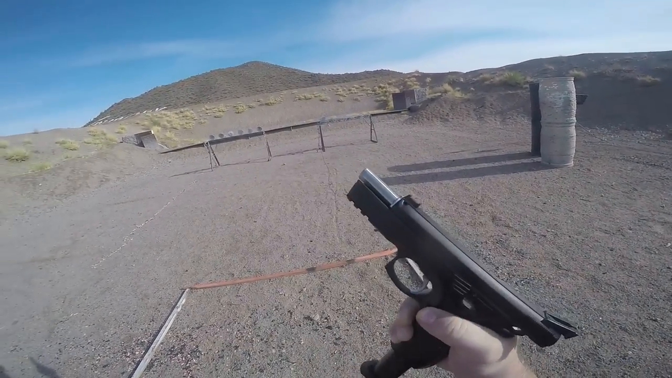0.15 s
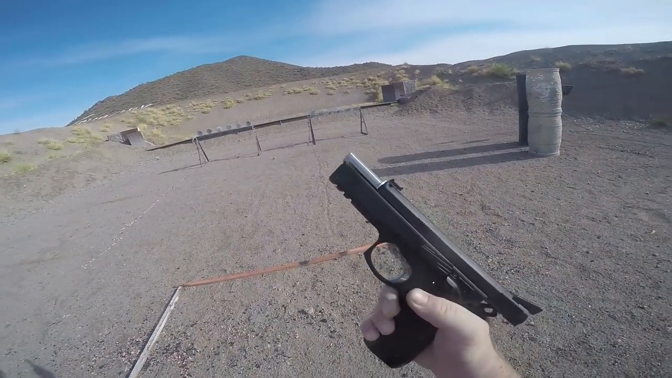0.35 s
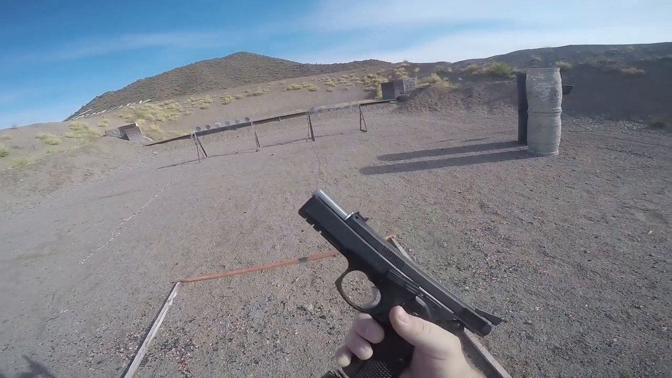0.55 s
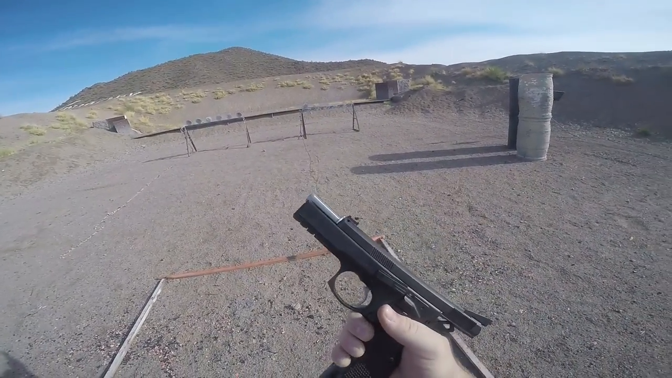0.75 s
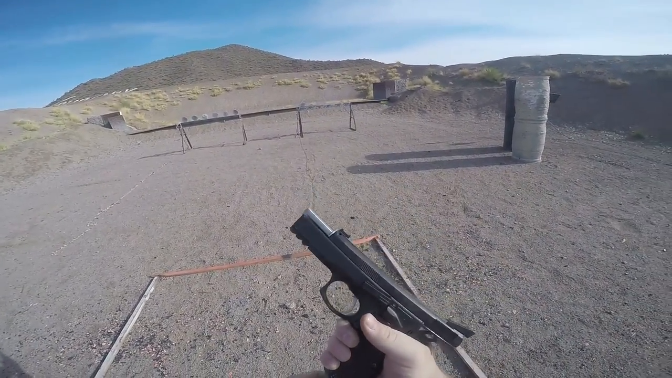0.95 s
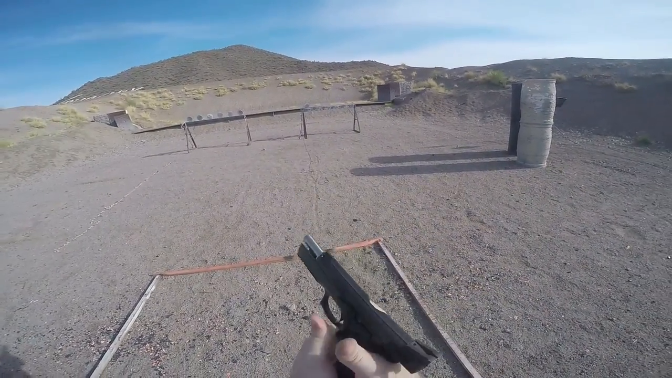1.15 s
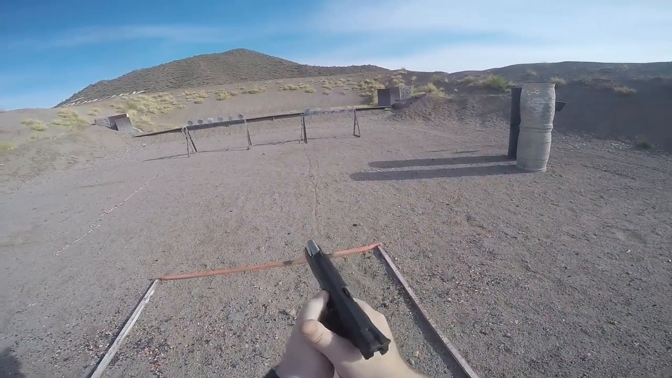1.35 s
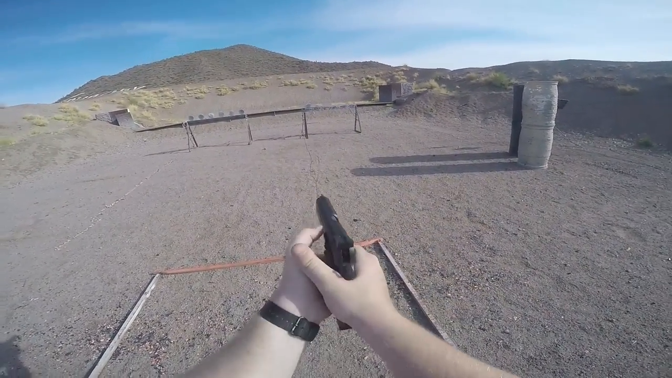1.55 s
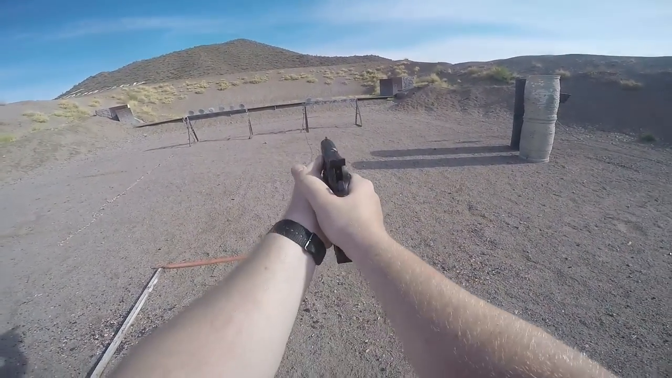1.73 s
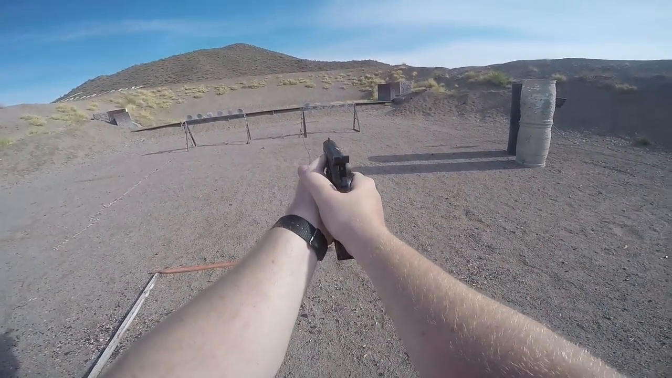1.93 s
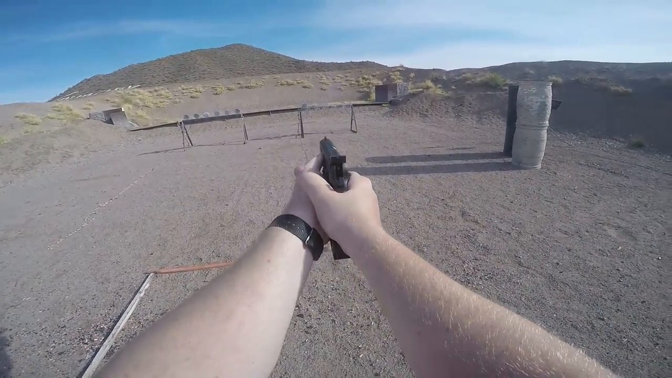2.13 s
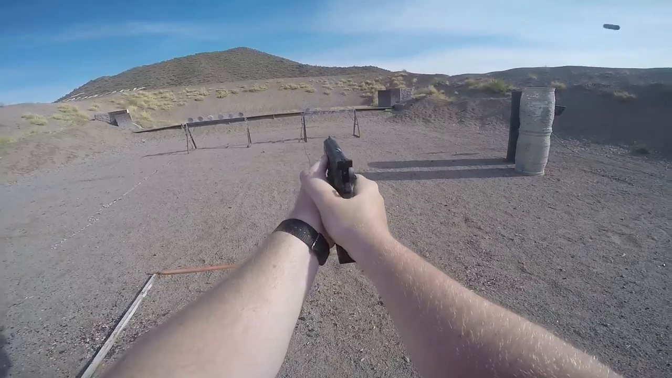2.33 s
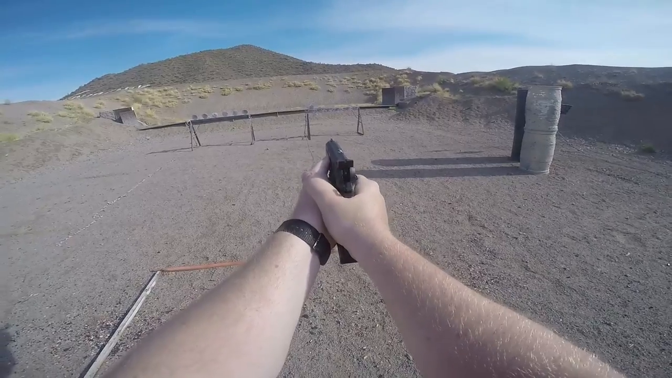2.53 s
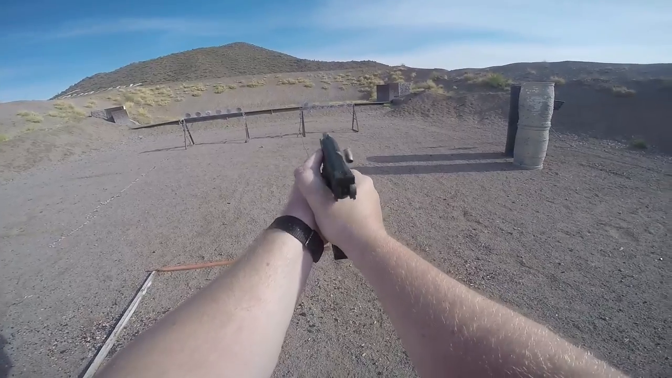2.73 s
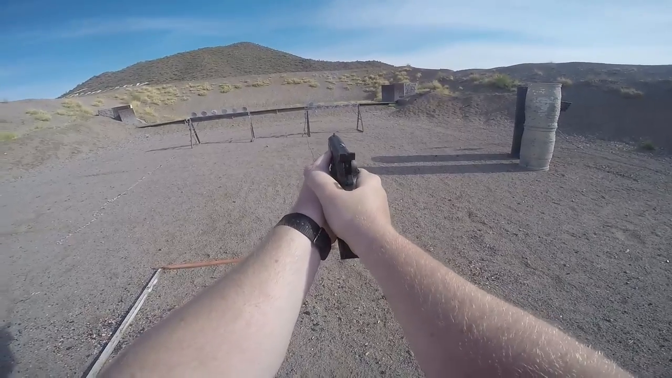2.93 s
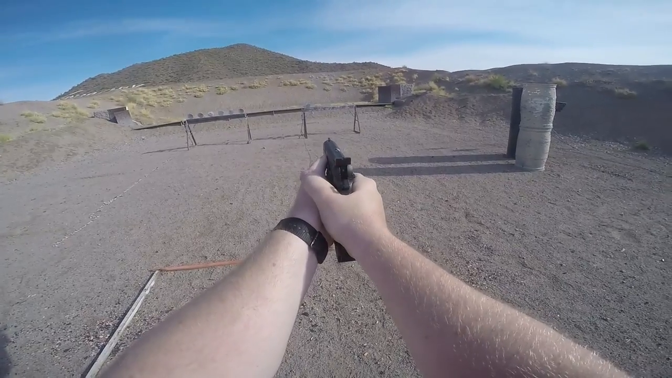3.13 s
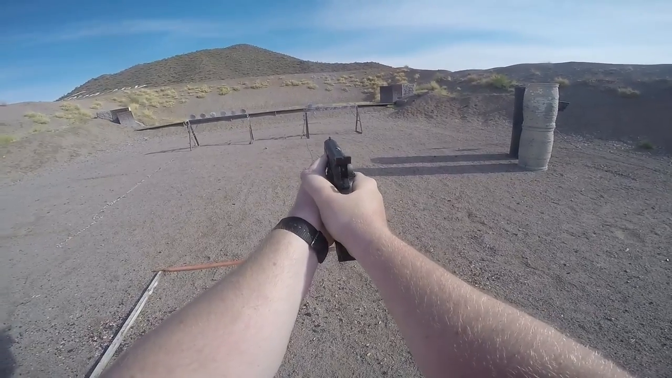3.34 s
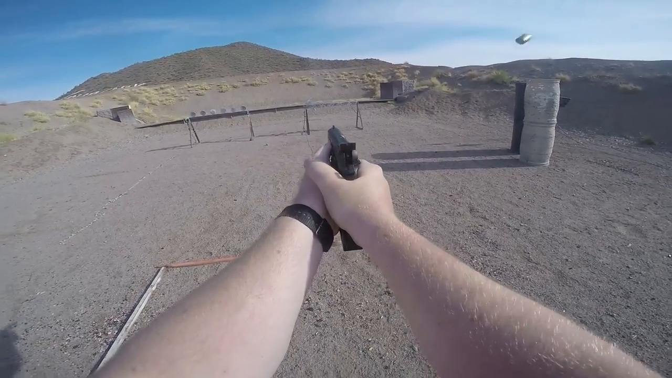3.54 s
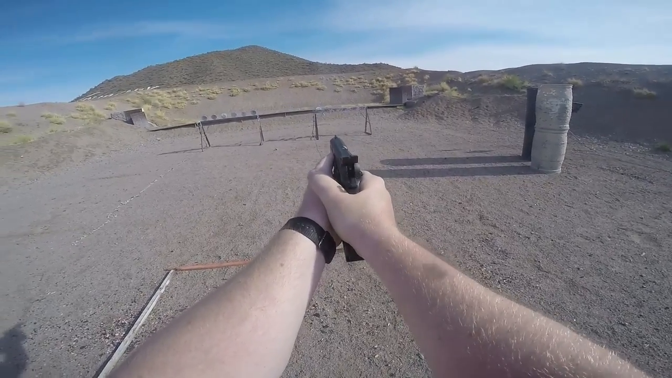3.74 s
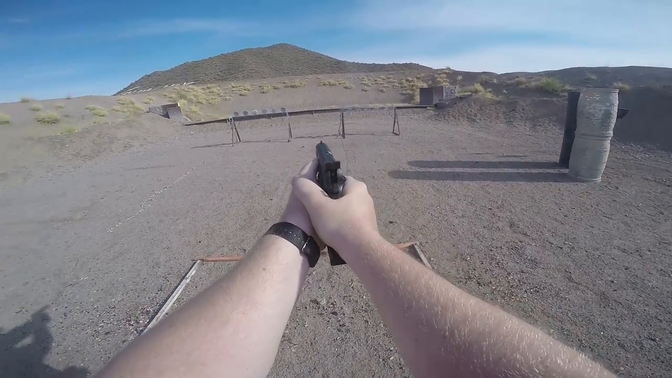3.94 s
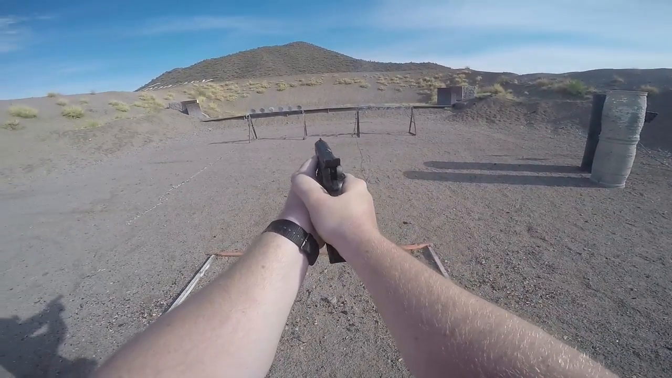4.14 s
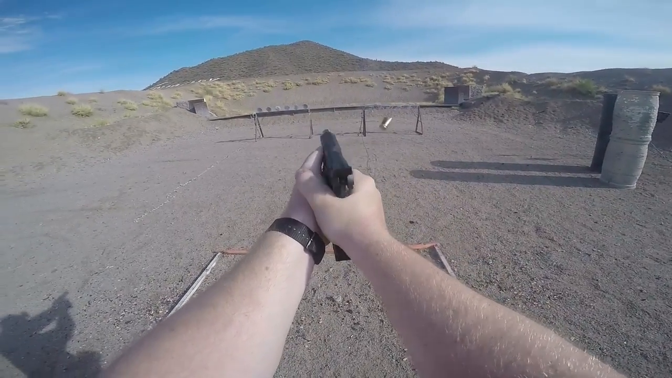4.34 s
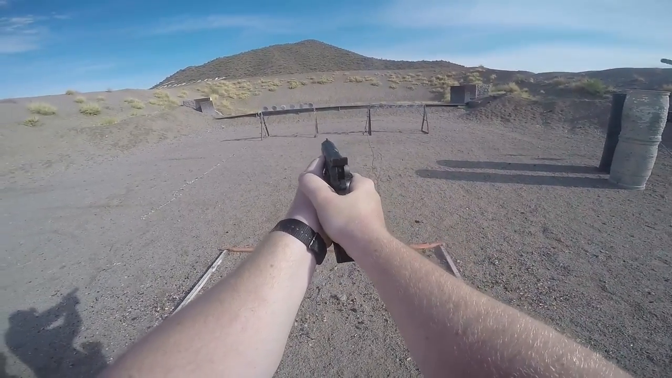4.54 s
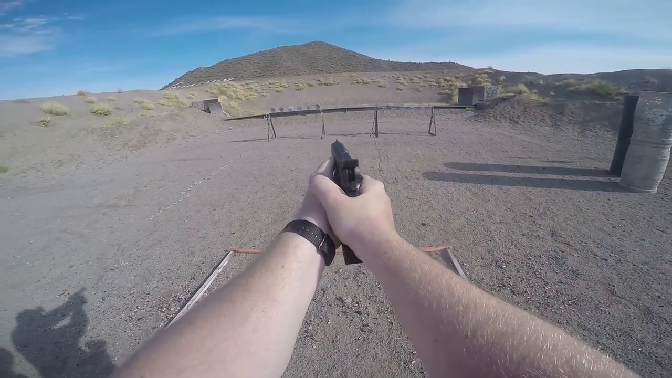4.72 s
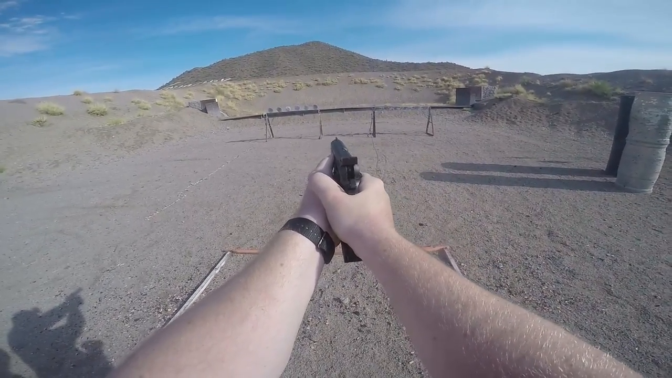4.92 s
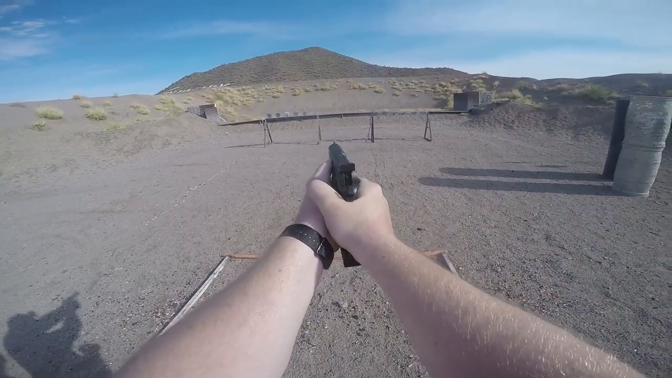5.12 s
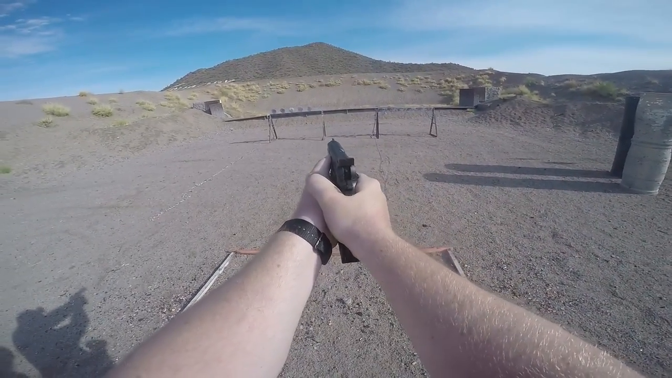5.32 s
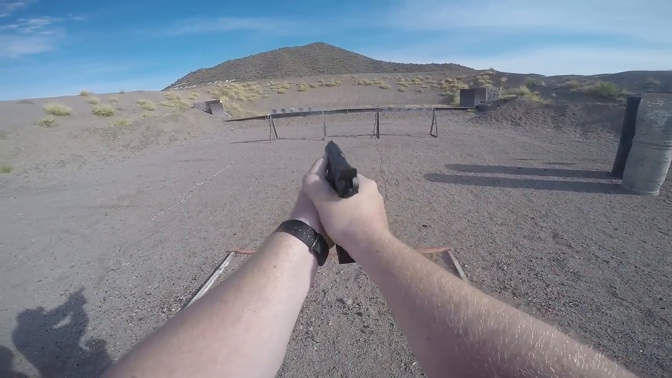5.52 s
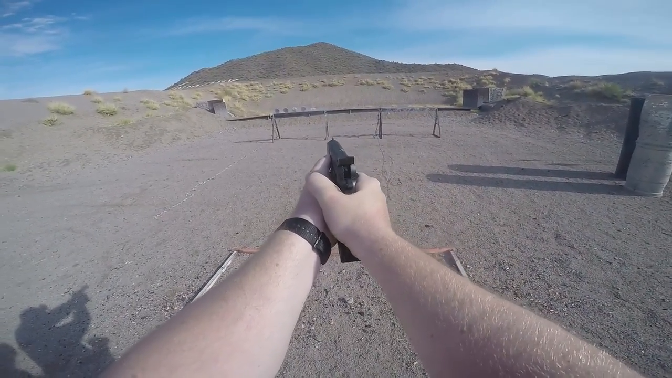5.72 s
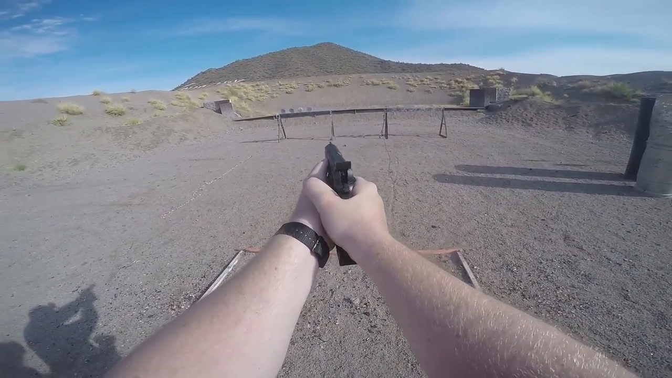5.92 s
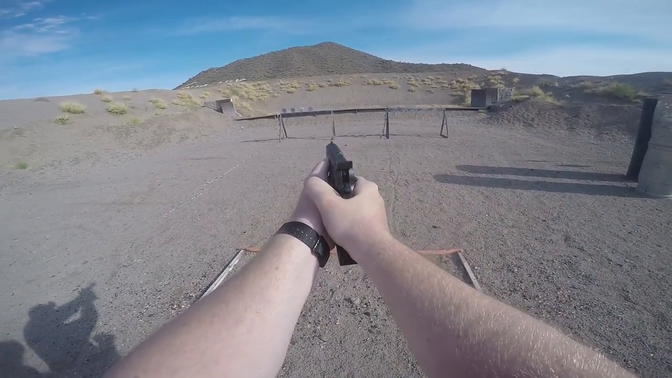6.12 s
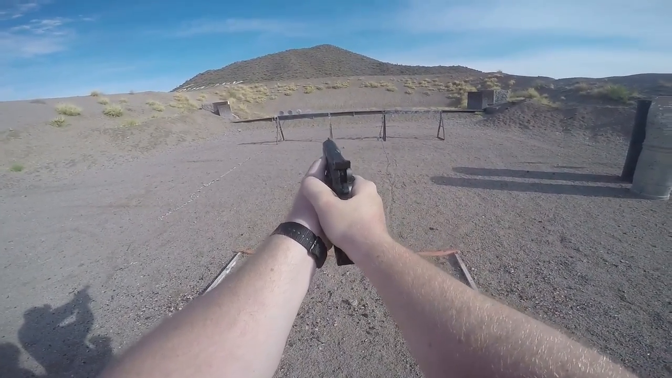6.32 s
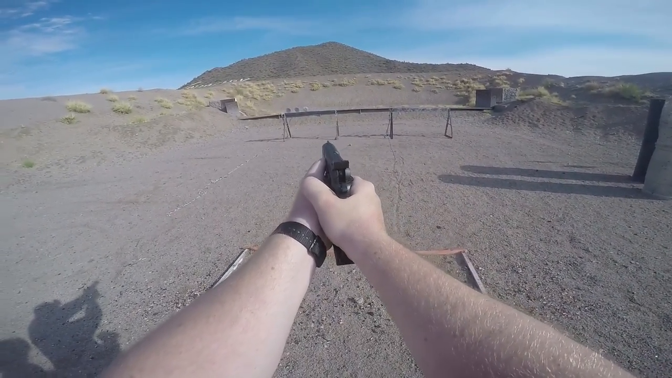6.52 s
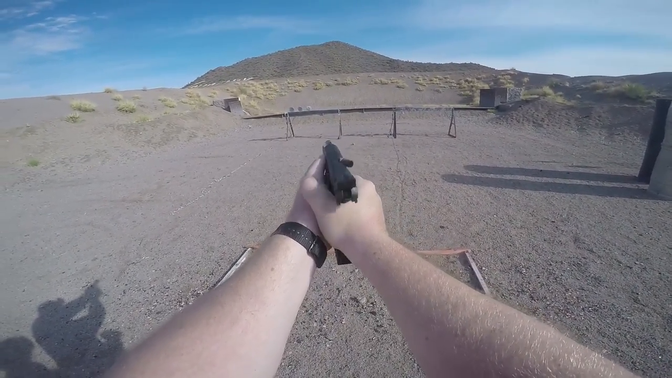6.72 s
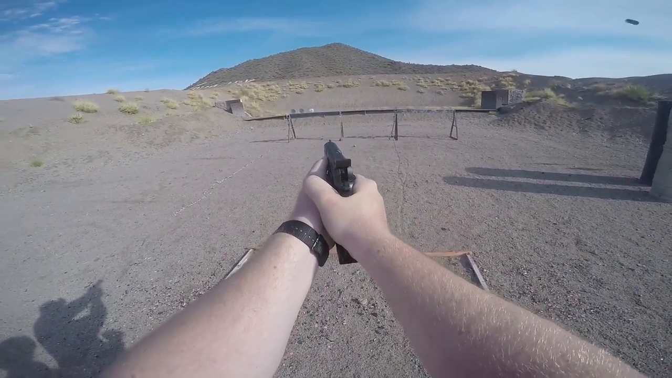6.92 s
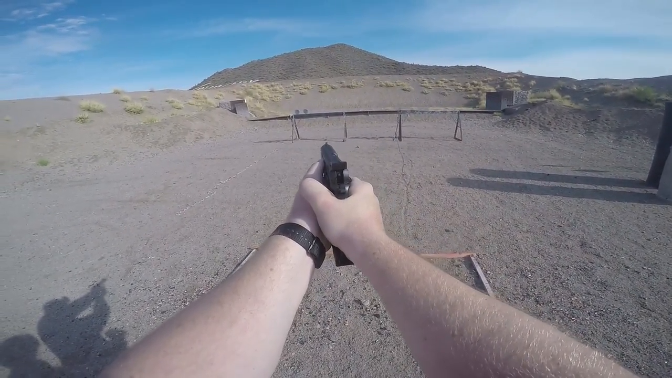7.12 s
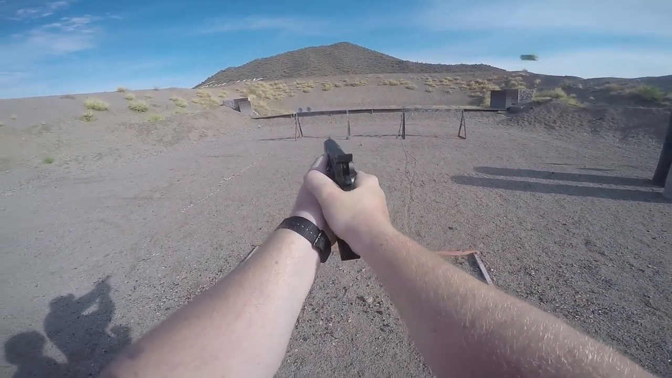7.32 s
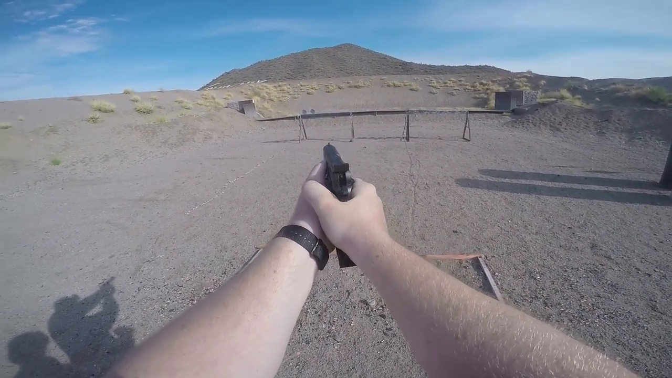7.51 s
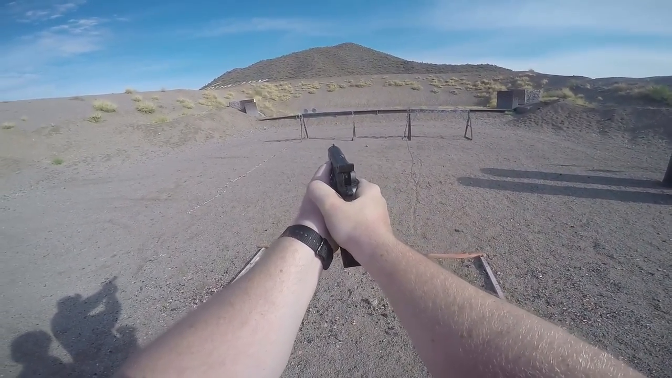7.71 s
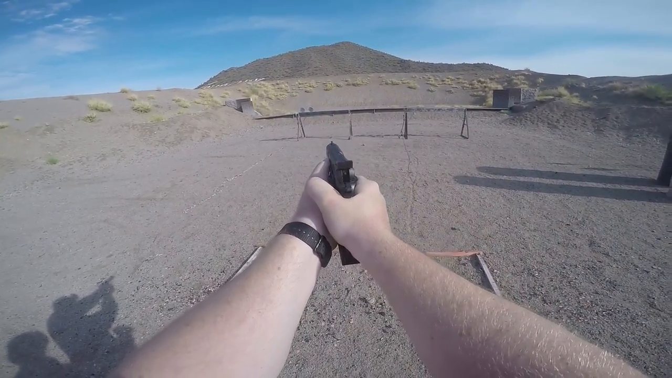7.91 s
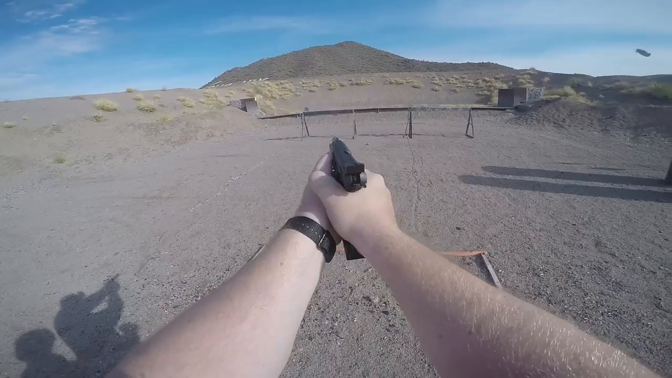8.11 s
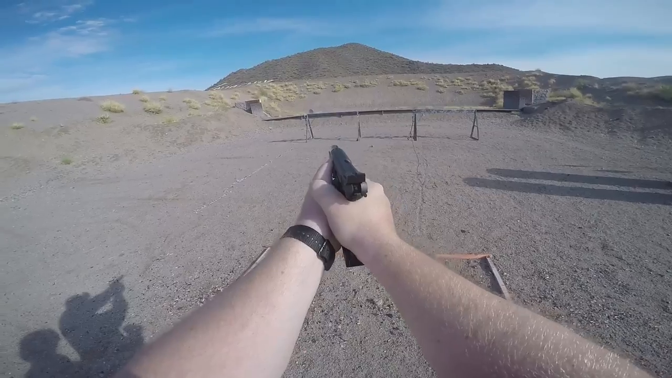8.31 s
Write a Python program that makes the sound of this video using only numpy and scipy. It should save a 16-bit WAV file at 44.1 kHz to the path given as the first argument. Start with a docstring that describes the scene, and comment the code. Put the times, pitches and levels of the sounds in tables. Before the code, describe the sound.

A pistol is handled close to the microphone on an outdoor range. Faint taps and scrapes lead to the magazine latching sharply at about 1.1 seconds, and the slide snaps shut at 1.5. Light wind rumble and far-off noise swell, with a dull distant shot at 1.9, then drop back when the firing starts.

Ten loud shots come at roughly 2.2, 2.8, 3.5, 4.4, 5.0, 5.6, 6.2, 6.8, 7.3 and 8.0 seconds. Each is a sharp crack with a heavy thump that overloads the microphone, followed by a quick slap and a short, low echo from the earth banks. A much quieter bullet impact follows each one. A fragment whines very faintly at about 3.2. From 3.6 onward, struck steel plates ring softly, and between 3.9 and 7.2 they fall onto their rack with faint clangs and pings.

```python
"""A pistol is loaded and fired ten times at steel plates in a gravel bay, heard from the shooter's head.
The magazine and slide click and scrape. Each blast bounces off the ground, echoes from the earth banks
and overloads the microphone. Bullets splash downrange and one fragment whines away; struck plates
ring, tip over and clang on their rack. Light wind, far-off noise and a thin whine swell until the
first shot, then drop back. Two dull shots come from other bays."""
import sys
import numpy as np
from scipy import signal
from scipy.fft import rfft, irfft
from scipy.io import wavfile

SR = 44100
rng = np.random.default_rng(int(sys.argv[2]) if len(sys.argv) > 2 else 0)


def log_audio(samples):
    """Write samples as a 16-bit WAV file to the path given in sys.argv[1]."""
    # one column per channel
    frames = np.atleast_2d(samples).T
    # limit to full scale, then quantise
    limited = np.clip(frames, -1, 1)
    pcm = np.round(limited * 32767).astype(np.int16)
    wavfile.write(sys.argv[1], SR, pcm)


N = 368676
EVENT_SIZE = 40960  # samples set aside for one short sound
T = np.arange(N) / SR  # seconds since the scene began
AGE = T[:EVENT_SIZE]  # seconds since a short sound began


def undb(db):
    """Turn decibels (dB) into a number to multiply a sound by."""
    return 10 ** (np.asarray(db) / 20)


def add(out, s, sound):
    """Mix a sound into out, starting at s seconds."""
    start = max(int(round(s * SR)), 0)
    part = sound[:max(len(out) - start, 0)]
    out[start:start + len(part)] += part


def fade(t60):
    """A smooth dying away; t60 is the fade time, the seconds it takes to fall by 60 dB."""
    return np.exp(-np.log(1000) * AGE / t60)


def noise(spectrum, size=EVENT_SIZE):
    """Noise of a standard strength, shaped by rows of pitch in Hz and level in dB."""
    hz, db = np.transpose(spectrum)
    log_hz = np.log(np.maximum(np.fft.rfftfreq(size, 1 / SR), 1))
    beyond_ends = np.minimum(log_hz - np.log(hz[0]), 0) + np.minimum(np.log(hz[-1]) - log_hz, 0)
    shape = undb(np.interp(log_hz, np.log(hz), db)) * np.exp(2 * beyond_ends)
    shaped = irfft(rfft(rng.standard_normal(size)) * shape, size)
    return shaped / shaped.std()


def flutter(rate, depth_db, size=EVENT_SIZE):
    """A volume that wanders at random, rate times a second."""
    steps = T[:size] * rate
    return undb(depth_db * np.interp(steps, np.arange(4096), rng.standard_normal(4096)))


def grains(rate):
    """Tiny random clicks of uneven size, about rate a second."""
    clicks = (rng.random(EVENT_SIZE) < rate / SR) * rng.standard_normal(EVENT_SIZE)
    return clicks / clicks.std()


def ring(tones):
    """A set of tones that start together and die away."""
    out = np.zeros(EVENT_SIZE)
    for hz, db, t60 in tones:
        age = AGE[AGE < 2 * t60]
        add(out, 0, undb(db) * np.exp(-np.log(1000) * age / t60) * np.sin(2 * np.pi * hz * age))
    return out


def strike(tones, scatter_db):
    """Each blow lands on a new spot and favours other tones; neighbours start in opposite directions."""
    return sum((-1) ** k * ring([(hz, db + scatter_db * rng.standard_normal(), t60)])
               for k, (hz, db, t60) in enumerate(tones))


def swell(start_db, rise_db_per_s, after_db):
    """A volume that climbs until the first shot, then quickly drops and stays low."""
    first_shot = SHOTS[0][0]
    peak_db = start_db + rise_db_per_s * first_shot
    return undb(np.interp(T, [0, first_shot, first_shot + .05], [start_db, peak_db, after_db]))


# The rumble of wind. Each row: pitch in Hz, level in dB.
WIND_SPECTRUM = [(20, -4), (65, -1.5), (95, -4.5), (140, -18.5), (250, -34.5), (2000, -64.5)]

def wind():
    """Light wind rumbles on the microphone."""
    return swell(start_db=-64, rise_db_per_s=11.7, after_db=-64) * noise(WIND_SPECTRUM, size=N)


# Far-off noise. Each row: pitch in Hz, level in dB.
MURMUR_SPECTRUM = [(150, -13), (220, -8.5), (300, -10), (430, -1.5), (620, -0.5), (800, -12.5),
                   (1100, -16.5), (1700, -27.5), (2800, -24.5), (5000, -32.5), (9000, -40.5), (15000, -48)]

def murmur():
    """Noise from far away wavers in level."""
    volume = swell(start_db=-66, rise_db_per_s=8.4, after_db=-68.5)
    return volume * noise(MURMUR_SPECTRUM, size=N) * flutter(rate=16, depth_db=-3.0, size=N)


# The tones of the background whine. Each row: pitch in Hz, level in dB.
WHINE_TONES = [(9600, 2), (14400, -4)]

def whine():
    """Two thin, high tones flicker faintly."""
    out = np.zeros(N)
    for hz, db in WHINE_TONES:
        flicker = noise([(20, -1.5), (110, -2)], size=N)
        out += undb(db) * flicker * np.sin(2 * np.pi * hz * T)
    return swell(start_db=-96, rise_db_per_s=7.5, after_db=-110) * out


# The thud of a distant shot. Each row: pitch in Hz, level in dB.
THUD_SPECTRUM = [(60, 5.5), (200, 5), (400, 8), (900, -10), (1500, -22), (2900, -23.5), (4500, -36.5)]
# Shots in other bays. Each row: start in seconds, level in dB.
DISTANT_SHOTS = [(0.304, -51.5), (1.934, -25.5)]

def distant_shots():
    """Shots from other bays arrive as dull thuds; distance softens their start."""
    out = np.zeros(N)
    rise = 1 - np.exp(-(AGE / 0.002) ** 2)
    for s, db in DISTANT_SHOTS:
        add(out, s, undb(db) * noise(THUD_SPECTRUM) * rise * (fade(0.047) + undb(-8.5) * fade(0.45)))
    return out


# The hiss of a palm on the grip. Each row: pitch in Hz, level in dB.
PALM_SPECTRUM = [(3500, -13.5), (4800, 4), (5600, -1), (6500, -11), (8000, -8.5)]

def grip(middle_s=1.4, half_length_s=.26):
    """The support hand slides round the grip with a soft hiss."""
    volume = undb(-64) * np.exp(-((T - middle_s) / half_length_s) ** 2)
    return volume * noise(PALM_SPECTRUM, size=N) * flutter(rate=32, depth_db=3.0, size=N)


# The noise of steel touching steel. Each row: pitch in Hz, level in dB.
STEEL_SPECTRUM = [(260, -23), (550, 1.5), (1100, -0.5), (1700, -7.5), (2750, 7), (3600, -0.5), (4800, 8.5),
                  (6300, 5.5), (7800, -6), (15000, -10.5)]
# The ringing of the gun's steel. Each row: pitch in Hz, level in dB, fade time in seconds.
GUN_TONES = [(1160, -9, .03), (2260, -8, 0.045), (2950, -11, .03), (3500, -8, 0.03), (4380, -7, .035),
             (4950, -4, 0.024), (5350, -3.5, 0.024), (6050, -4, 0.028), (6600, -5, 0.028)]
GUN_RING_DB = -8.5  # the ringing compared with the contact noise

def click(db):
    """Steel hits steel: a burst of noise and a ring, both longer when the blow is harder."""
    longer = 2 ** (db / 48.5)  # 48.5 dB harder lasts twice as long
    contact = noise(STEEL_SPECTRUM) * (fade(0.023 * longer) + undb(-58.5) * fade(0.71))
    tones = [(hz, tone_db, t60 * longer) for hz, tone_db, t60 in GUN_TONES]
    return undb(db) * (contact + undb(GUN_RING_DB) * strike(tones, scatter_db=2.5))


# The magazine's thin walls. Each row: pitch in Hz, level in dB, fade time in seconds.
MAGAZINE_TONES = [(1560, -13.5, 0.25), (2300, -12, .25), (2994, -11, 0.28)]
# Light taps on the magazine. Each row: start in seconds, level in dB.
MAGAZINE_TAPS = [(0.172, -58), (0.205, -59), (0.384, -58.5), (.847, -54)]

def magazine_taps():
    """The magazine taps, rubs and rings as it is drawn."""
    out = np.zeros(N)
    for s, db in MAGAZINE_TAPS:
        rubbing = flutter(rate=400, depth_db=5)
        add(out, s, click(db) + undb(db) * strike(MAGAZINE_TONES, scatter_db=2.5) * rubbing)
    return out


# Blows of the magazine and slide. Each row: start in seconds, level in dB.
LOADING_CLICKS = [(.103, -52), (0.1252, -47.5), (0.6059, -43.5), (0.6605, -25), (0.674, -35.5),
                  (0.823, -39), (.864, -46), (0.927, -30), (0.9553, -28.5), (0.967, -30), (1.049, -34.5),
                  (1.0611, -24.5), (1.0641, -14), (1.0803, -5), (1.278, -49.5), (1.3718, -35.5),
                  (1.4254, -16), (1.4466, -15.5), (1.4561, -2.5), (1.4610, -7), (1.4690, -17.5)]

def loading_clicks():
    """The magazine knocks in and latches; the slide on top of the gun snaps shut."""
    out = np.zeros(N)
    for s, db in LOADING_CLICKS:
        add(out, s, click(db))
    return out


# Steel sliding on steel. Each row: start and length in seconds, first and last level in dB.
LOADING_SCRAPES = [(0.672, 0.02, -48.5, -45), (0.962, 0.091, -52.5, -51.5), (1.099, 0.025, -50, -64.5),
                   (1.434, 0.023, -37.5, -26), (1.459, 0.023, -25, -57)]

def loading_scrapes(release_s=.07):
    """The magazine and slide stick and slip as they move, which makes the gun ring."""
    out = np.zeros(N)
    steel = ring(GUN_TONES)
    steel /= np.linalg.norm(steel)
    for s, length, start_db, end_db in LOADING_SCRAPES:
        release_db = 60 * np.maximum(AGE - length, 0) / release_s
        pressure = undb(np.interp(AGE, [0, length], [start_db, end_db]) - release_db)
        rub = pressure * noise(STEEL_SPECTRUM) * flutter(rate=520, depth_db=4.5)
        ringing = signal.fftconvolve(rub, steel)[:EVENT_SIZE]
        add(out, s, undb(5.0) * rub + undb(GUN_RING_DB) * ringing)
    return out


# Dry ticks between shots. Each row: start in seconds, level in dB.
DRY_TICKS = [(2.404, -50), (2.971, -47), (3.024, -49), (3.084, -51), (4.666, -46.5)]

def ticks():
    """The trigger and scattered grit make tiny bursts of noise."""
    out = np.zeros(N)
    for s, db in DRY_TICKS:
        add(out, s, undb(db) * noise(SPLASH_SPECTRUM) * fade(0.005))
    return out


def ricochet(start_s=3.17, length_s=.39, fade_s=.08, start_hz=1310, fall_hz_per_s=700):
    """A tumbling fragment whines faintly, falling in pitch as it slows."""
    age = np.clip(T - start_s, 0, length_s)
    hz = start_hz - fall_hz_per_s * age
    volume = np.minimum(np.minimum(age, length_s - age) / fade_s, 1)
    return undb(-74) * volume * np.sin(2 * np.pi * np.cumsum(hz) / SR)


# The rack's main tones. Each row: pitch in Hz, level in dB.
RACK_TONES = [(1427, -12), (2045, -9.5), (2287, -3.5), (2444, -6.5), (2702, -0.5), (3040, -6.5),
              (3768, -14), (4226, -20), (4520, -8), (4716, -14.5), (5776, -16)]
# The colour of the chatter and of the frame's small tones. Each row: pitch in Hz, level in dB.
CLANG_SPECTRUM = [(400, -9), (900, 6), (1400, -3), (2300, 2.5), (2900, 2), (3500, -4.5), (5500, -5.5),
                  (8000, -14.5), (11000, -15), (15000, -29.5)]

def clang(t60, count=66, detune=.002, damped_above_hz=4000):
    """A plate drops on its stop and chatters; every knock rings the rack and its frame."""
    pitches = 1900 * (10500 / 1900) ** ((np.arange(count) + rng.random(count)) / count)
    frame_tones = [(hz, np.interp(hz, *np.transpose(CLANG_SPECTRUM)) - 7) for hz in pitches]
    # the landed plate shifts each tone a little, and high tones die sooner
    tones = [(hz * (1 + detune * rng.standard_normal()), db, t60 * min(damped_above_hz / hz, 1))
             for hz, db in RACK_TONES + frame_tones]
    knocks = grains(rate=220) * fade(t60)
    knocks /= np.linalg.norm(knocks)
    knocks[0] += 1  # the first knock is as strong as all the bounces together
    metal = signal.fftconvolve(knocks, strike(tones, scatter_db=3))[:EVENT_SIZE]
    metal *= np.linalg.norm(fade(t60)) / np.linalg.norm(metal)
    chatter = undb(-1) * noise(CLANG_SPECTRUM) * fade(t60)
    return (metal + chatter) * flutter(rate=400, depth_db=2.5)


# Two close tones of a landed plate. Each row: pitch in Hz, level in dB, fade time in seconds.
PING_TONES = [(2858, -3, .7), (2869, -5, .7)]
# Plates landing. Each row: start in seconds, clang in dB, its fade time in seconds, ping in dB.
LANDINGS = [(3.894, -47, 0.35, -76), (4.086, -49.5, 0.28, -63.5), (5.343, -46.5, 0.49, -45.5),
            (5.5, -46.5, 0.21, -62), (5.895, -48, 0.6, -65.5), (6.553, -49, 0.58, -56),
            (7.131, -48, 0.62, -51)]

def plate_landings():
    """A falling plate clangs on the rack and pings; its two close tones make the ping throb."""
    out = np.zeros(N)
    for s, db, t60, ping_db in LANDINGS:
        add(out, s, undb(db) * clang(t60) + undb(ping_db) * ring(PING_TONES))
    return out


def strike_time(shot, lag_s=.0517, extra_s_per_shot=0.0004):
    """The bullet flies out and its sound comes back, later as the aim moves along the rack."""
    return SHOTS[shot][0] + lag_s + shot * extra_s_per_shot


def tipping(dip_s, swept_s=.215, flat_s=.3):
    """A tipping plate sweeps beams of sound past us: a dip, one broad swell, then quick weak ones."""
    beam = np.interp(AGE, [0, min(dip_s, swept_s), swept_s, flat_s], [0, .5, 1.5, 3.5])
    sweep = np.hypot(np.cos(np.pi * beam), .15)  # a little sound is left between the beams
    return sweep * undb(-8 * np.maximum(beam - 1, 0))


# The shots that hit a plate squarely, counted from 0.
SQUARE_HITS = [2, 4, 5, 6, 7, 9]
# The plates they hit. Each row: one plate's tones, each with pitch in Hz, level in dB,
# fade time in seconds, seconds until its first dip.
PLATE_TONES = [
    [(7300, -53.5, 2.2, 0.062)],
    [(2860, -27.5, .42, 0.13), (4705, -46, 1.9, .03), (12070, -52, 0.41, .11)],
    [(1950, -44, 0.15, .1), (4484, -43.5, 0.63, 0.058), (7444, -46, 1.6, 0.065), (10650, -52, 0.36, .09)],
    [(2115, -36.5, 0.36, 0.099), (7900, -40.5, 0.3, .11)],
    [(4500, -58.5, 2, .05), (7300, -60, 1.3, 0.034), (10600, -52, 0.61, 0.2)],
    [(2550, -29.5, 0.063, .1), (4670, -47.5, 0.11, .1)],
]

def struck_plates():
    """A struck plate rings and rattles while it tips over."""
    out = np.zeros(N)
    for shot, tones in zip(SQUARE_HITS, PLATE_TONES):
        for hz, db, t60, dip_s in tones:
            rattle = flutter(rate=160, depth_db=1)
            add(out, strike_time(shot), ring([(hz, db, t60)]) * tipping(dip_s) * rattle)
    return out


# A bullet's splash, also used for the dry ticks. Each row: pitch in Hz, level in dB.
SPLASH_SPECTRUM = [(200, 3.5), (1100, 11), (1700, -11), (2700, 7.5), (4000, -4), (5500, -2), (8000, -13.5),
                   (15000, -14)]

def bullet_splashes():
    """Each bullet splashes downrange: a sharp burst of noise with a faint tail."""
    out = np.zeros(N)
    volume = fade(0.028) + undb(-23.5) * fade(0.32)
    for shot, (*_, db) in enumerate(SHOTS):
        add(out, strike_time(shot), undb(db) * noise(SPLASH_SPECTRUM) * volume)
    return out


# The blast as it returns from gravel, banks and small hard things. Each row: pitch in Hz, level in dB.
GRAVEL_SPECTRUM = [(60, -9), (200, -1.5), (550, 4.5), (900, 1.5), (1400, -10.5), (2800, -19.5),
                   (6000, -26.5), (8000, -36.5), (15000, -47)]
BANK_SPECTRUM = [(50, -11), (170, -3), (300, -1), (500, 2), (700, -5), (1000, -15.5), (1500, -32),
                 (3000, -48.5)]
HISS_SPECTRUM = [(700, -3), (1500, -8), (2800, 6.5), (3600, -8), (5500, -6), (8000, -23.5), (15000, -24.5)]

def bay():
    """Gravel scatters the blast at once, stones and posts crackle, banks and hills roll the bass back."""
    stones = signal.fftconvolve(grains(rate=280), noise(HISS_SPECTRUM) * fade(0.03))[:EVENT_SIZE]
    gravel = undb(-19.5) * noise(GRAVEL_SPECTRUM) * fade(0.19) * (1 - np.exp(-AGE / 0.0034))
    hills = undb(-28.5) * noise(BANK_SPECTRUM) * fade(0.89) * (1 - np.exp(-AGE / 0.16))
    barrels_and_frames = undb(-32.5) * noise(HISS_SPECTRUM) * fade(0.049)
    back_bank = undb(-19.0) * noise(BANK_SPECTRUM) * fade(0.094) * (1 - np.exp(-AGE / 0.0011))
    out = gravel + hills + undb(-42.5) * stones / stones.std() * fade(0.63)
    add(out, .023, barrels_and_frames)
    add(out, .1005, back_bank)
    return out


# Echoes off barrels, side banks and the back bank. Each row: delay in seconds, thud level in dB,
# pitch in Hz, half the thud's length in seconds, crack level in dB, crack fade time in seconds.
ECHO_PATHS = [(0.0182, -21.5, 603, 0.00065, -26.5, .02), (0.0264, -7.5, 557, 0.0014, -18.5, 0.036),
              (0.0371, -19.5, 226.6, 0.0036, -35, 0.036), (0.1044, -5, 465, 0.0017, -35, 0.031),
              (0.1068, -20.5, 206, 0.0035, -56.5, 0.036), (0.1241, -25, 199, 0.0046, -65, 0.026)]

def echoes(delay_spread_s=.0008, pitch_spread=.06):
    """Each echo is a short, rounded thud with a faint crack. Gives the thuds and the cracks' volume."""
    thuds, crack_volume = np.zeros((2, EVENT_SIZE))
    for delay, db, hz, width, crack_db, t60 in ECHO_PATHS:
        nearness = ECHO_PATHS[0][0] / delay  # near paths shift most as the shooter turns
        delay += nearness * delay_spread_s * rng.standard_normal()
        hz *= 1 + pitch_spread * rng.standard_normal()
        t = AGE - delay
        thuds += undb(db) * np.sin(2 * np.pi * hz * t) * np.exp(-(t / width) ** 2)
        add(crack_volume, delay - width, undb(crack_db) * fade(t60))
    return thuds, crack_volume


def thump(low_hz, high_hz, order=3):
    """One push of air, filtered to lie between two pitches."""
    band = signal.butter(order, [low_hz, high_hz], "band", fs=SR, output="sos")
    pulse = signal.sosfilt(band, signal.unit_impulse(EVENT_SIZE) + 1e-18)
    return pulse / abs(pulse).max()


# The blast arriving directly and off the ground.
# Each row: delay in seconds, level in dB, lowest and highest pitch in Hz.
BLAST_PATHS = [(.00105, 6, 185, 476), (.0075, 8.5, 407, 770), (.0078, -7, 93, 293)]
# Low tones that ring briefly just after each blast.
# Each row: pitch in Hz, level in dB, fade time in seconds.
BLAST_RING_TONES = [(163, -23, 0.13), (222, -20, 0.04), (400, -20, 0.1), (530, -14, 0.055), (676, -18, .07),
                    (1140, -32, 0.12)]

def muzzle_blast(stretch):
    """A shot's smooth wave of air, and the volume of the crack on it; more stretch makes them longer."""
    wave, crack_volume = np.zeros((2, EVENT_SIZE))
    for delay, db, low_hz, high_hz in BLAST_PATHS:
        add(wave, delay, undb(db) * thump(low_hz / stretch, high_hz / stretch))
    add(wave, .0019, undb(4.0) * thump(low_hz=23.1, high_hz=92.3, order=2))  # a push, then suction
    add(wave, .0068, ring(BLAST_RING_TONES))
    add(crack_volume, 0, undb(13.0) * fade(0.013 * stretch))
    add(crack_volume, .0078, undb(-3.5) * fade(0.015))  # off the ground
    return wave, crack_volume


# The sharp crack of a shot. Each row: pitch in Hz, level in dB.
CRACK_SPECTRUM = [(300, 10.5), (1000, 7.5), (1500, -3.5), (3100, 0), (5200, -4.5), (6500, -10.5),
                  (8000, -17.5), (15000, -23)]
# The ten shots. Each row: start in seconds, then levels in dB of blast, crack, echoes and bullet splash.
SHOTS = [(2.224, 3, 7, 1, -23), (2.7890, -1.5, 1, -0.5, -26.5), (3.5206, 2, -0.5, -0.5, -21),
         (4.3665, -2, -1, 1, -27), (5.03, 0, 0.5, 1.5, -21.5), (5.5825, 0, 0, -2, -25.5),
         (6.234, -1, 0.5, 0, -21), (6.779, -2, -2.5, -2, -25), (7.3120, -2.5, 1, -2.5, -30),
         (8.0033, -1, -1, -0.5, -20.5)]

def pistol(same_share=0.6):
    """Ten blasts with their echoes; the shooter stands still, so much of the fine detail repeats."""
    out = np.zeros(N)
    same_crack, same_bay = noise(CRACK_SPECTRUM), bay()
    terrain = flutter(rate=110, depth_db=3.0)  # uneven ground returns the sound in patches
    same, fresh = np.sqrt(same_share), np.sqrt(1 - same_share)
    for s, blast_db, crack_db, echo_db, _ in SHOTS:
        stretch = 1 + .04 * rng.standard_normal()  # no two cartridges burn alike
        wave, near_volume = muzzle_blast(stretch)
        thuds, far_volume = echoes()
        crack = same * same_crack + fresh * noise(CRACK_SPECTRUM)
        tail = terrain * (same * same_bay + fresh * bay())
        near = undb(blast_db) * wave + undb(crack_db) * near_volume * crack
        far = undb(echo_db) * (thuds + far_volume * crack + tail)
        add(out, s, near + far)
    return out


def scene():
    """Everything that reaches the microphone, in one channel."""
    shooting = pistol() + bullet_splashes() + struck_plates() + plate_landings() + ricochet()
    handling = loading_clicks() + loading_scrapes() + magazine_taps() + ticks() + grip()
    background = wind() + murmur() + whine() + distant_shots()
    return (shooting + handling + background)[None]


def record(dry):
    """The blasts overload the microphone, which squashes their peaks; the highest treble is cut."""
    ceiling, top_hz = .98, 15400
    squashed = ceiling * np.tanh(dry / ceiling)
    treble_cut = signal.ellip(10, .2, 90, top_hz, fs=SR, output="sos")
    return signal.sosfilt(treble_cut, squashed)


dry = scene()
out = record(dry)
log_audio(out)
```